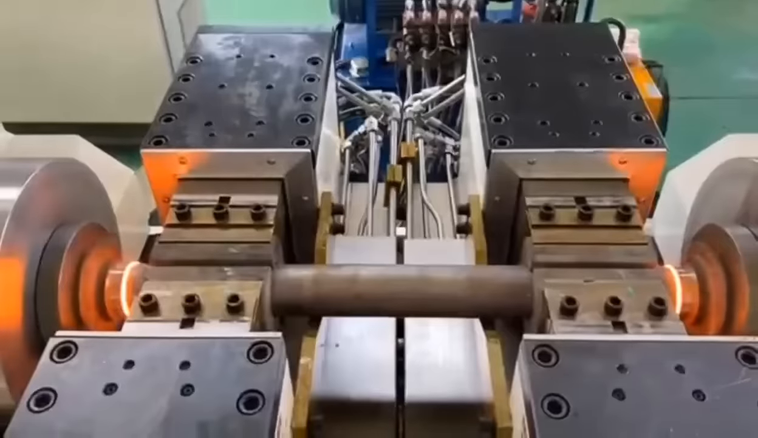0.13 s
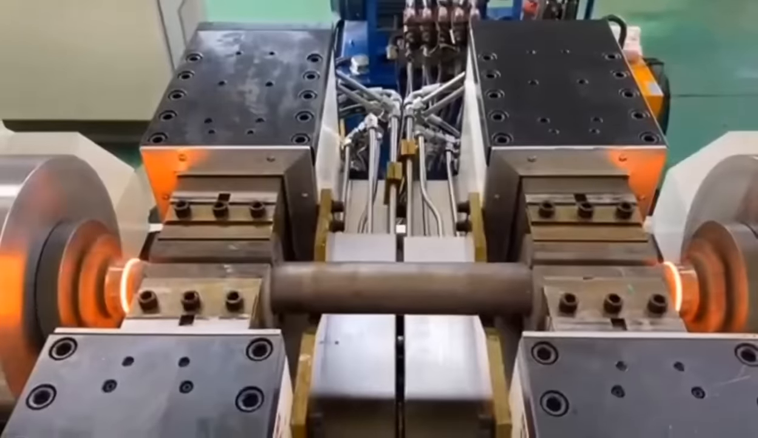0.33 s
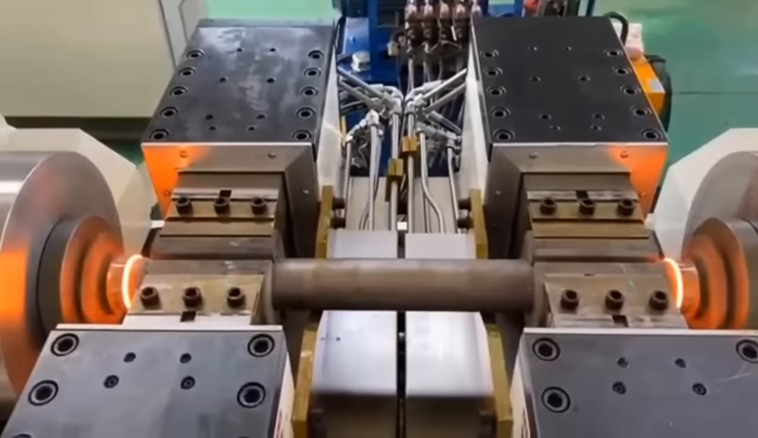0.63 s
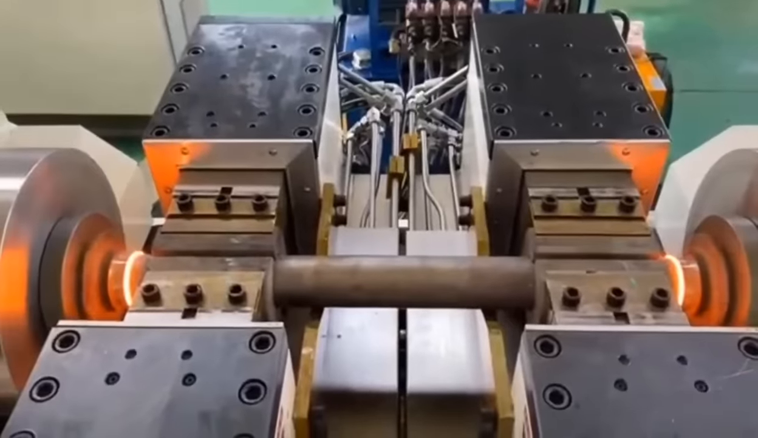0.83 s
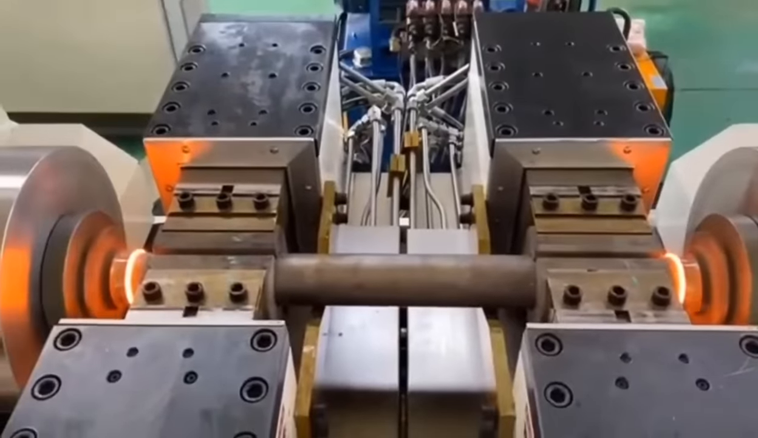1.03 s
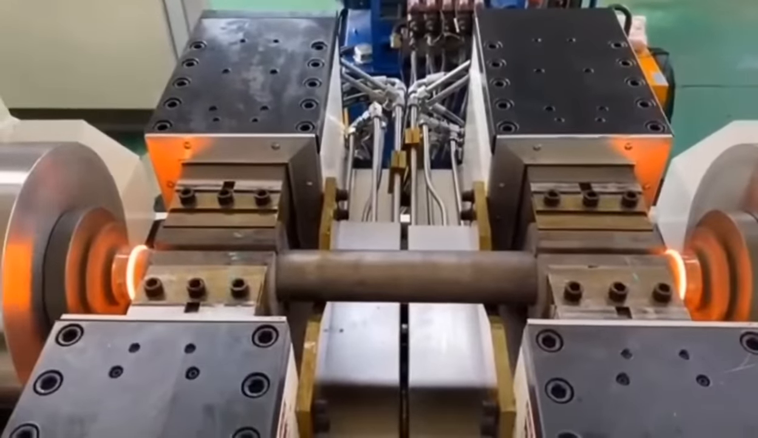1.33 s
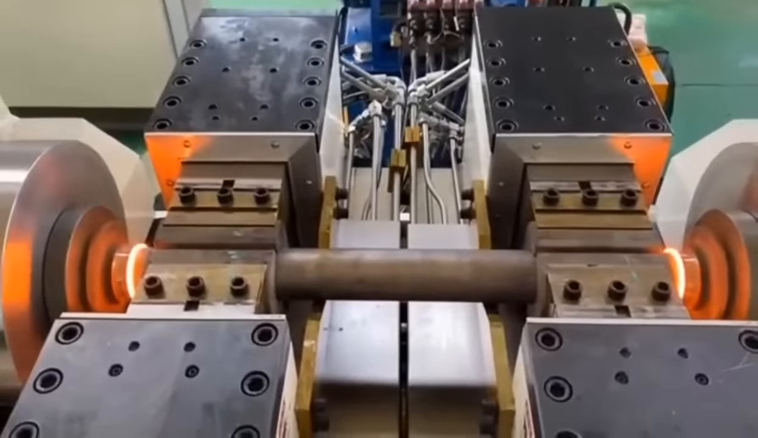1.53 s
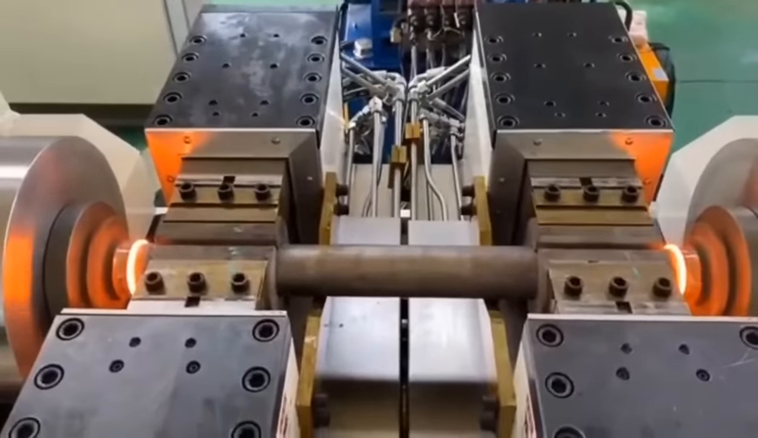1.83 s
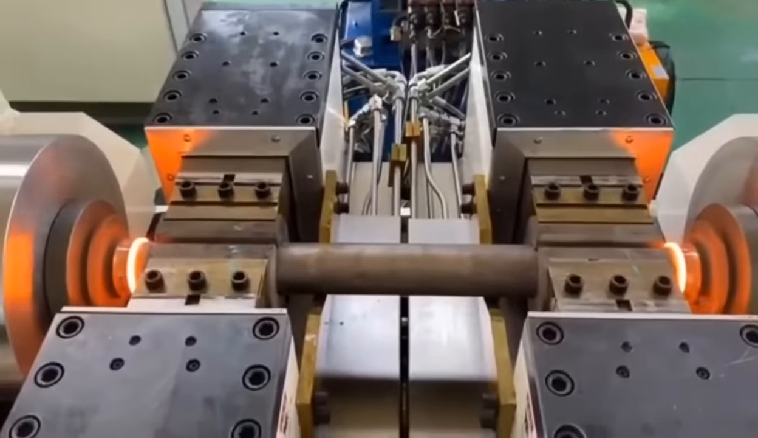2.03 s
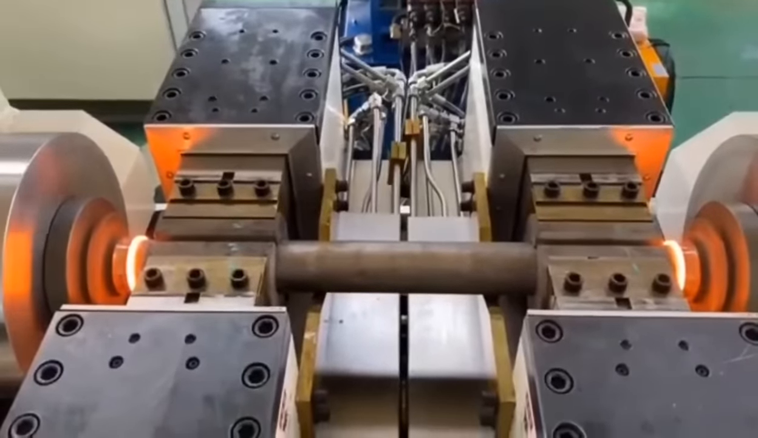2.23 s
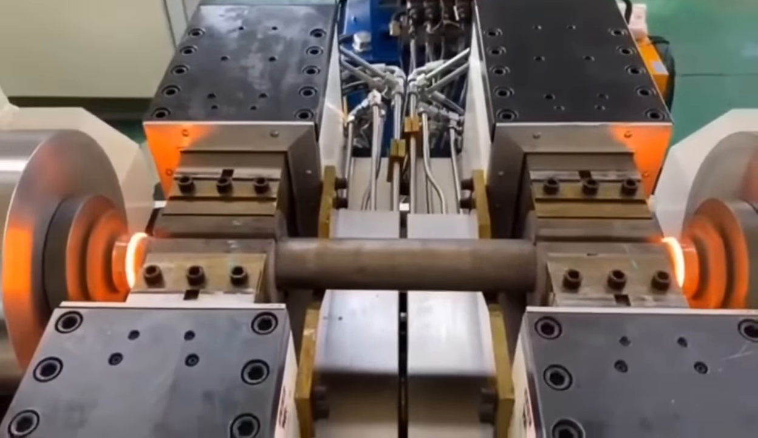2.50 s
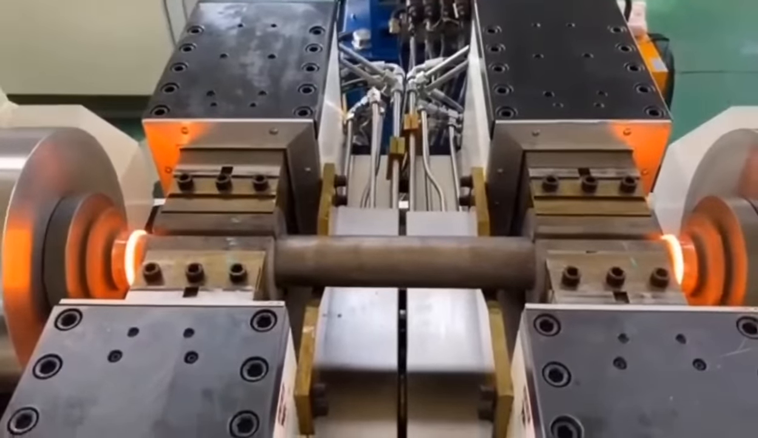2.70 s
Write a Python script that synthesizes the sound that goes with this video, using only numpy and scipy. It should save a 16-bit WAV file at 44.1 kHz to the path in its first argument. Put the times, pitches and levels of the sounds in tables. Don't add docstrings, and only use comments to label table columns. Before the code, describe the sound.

Steady high gear whine from a heavy spinning welder, swelling with low frame hum and rumble.

```python
import sys
import numpy as np
from scipy import signal
from scipy.fft import rfft, irfft
from scipy.io import wavfile
from scipy.ndimage import uniform_filter1d

SR = 44100
rng = np.random.default_rng(int(sys.argv[2]) if len(sys.argv) > 2 else 0)


def master_out(mix):
    frames = np.transpose(np.atleast_2d(mix))
    ceiling = np.clip(frames, -1, 1)
    pcm = np.round(ceiling * 32767).astype(np.int16)
    wavfile.write(sys.argv[1], SR, pcm)


def nominal_scale(level):
    x = np.asarray(level, float) / 20
    return 10 ** x


N = 126126
T = np.arange(N) / SR
MESH_HZ, WHEEL_TEETH, PINION_TEETH = 1083.38, 124, 50


def evened(x):
    return x / np.sqrt(np.mean(x ** 2) + 1e-20)


def hump(hz, centre_hz, width_hz):
    return 1 / (1 + (2 * (hz - centre_hz) / width_hz) ** 2)


def noise(gain):
    hz = np.fft.rfftfreq(N, 1 / SR)
    return irfft(rfft(rng.standard_normal(N)) * gain(hz), N) * np.sqrt(SR / 2)


def drift(rate_hz):
    return evened(noise(lambda hz: hump(hz, 0, rate_hz) * (hz > 0)))


def tones(pitches_hz, levels_db, waver_db):
    total = np.zeros(N)
    for hz, db in zip(pitches_hz, levels_db):
        level = np.sqrt(2) * nominal_scale(db + waver_db * drift(4.5))
        total += level * np.sin(2 * np.pi * (hz * T + rng.random()))
    return total


def rumble(resonances):
    def gain(hz):
        return np.sqrt(sum(nominal_scale(db) ** 2 / w * hump(hz, f, w) ** 2 for f, w, db in resonances))
    return noise(gain)


# pitch_hz [Hz], level_db [dB per Hz]
WASH_SPECTRUM = [(240, -67), (400, -30), (862, -22), (1080, -17.5), (1540, -34.5), (2140, -18.5),
                 (2770, -32), (3280, -34.5), (12000, -40), (15600, -106), (22000, -120)]


def wash():
    knots_hz, knots_db = np.transpose(WASH_SPECTRUM)

    def gain(hz):
        return nominal_scale(np.interp(np.log(hz + 1), np.log(knots_hz + 1), knots_db))
    return evened(noise(gain)) * nominal_scale(-13.5)


# pitch_hz [Hz], width_hz [Hz], level_db [dB], t60_s [s]
AIR_BANDS = [
    (7280, 1000, -60, .6),
    (7910, 560, -64.5, 1.2),
]


def air():
    total = np.zeros(N)
    for centre_hz, width_hz, db, t60_s in AIR_BANDS:
        hiss = evened(noise(lambda hz: 1 / (1 + (2 * (hz - centre_hz) / width_hz) ** 4)))
        total += hiss * nominal_scale(db - 60 * T / t60_s + drift(40))
    return total


# pitch_hz [Hz], width_hz [Hz], level_db [dB]
BED_RESONANCES = [(71.7, 18, -6.5), (109.6, 48, -5), (155, 80, 0.5), (461, 210, -4), (538, 120, -7.5),
                  (630.5, 55, -3.5)]


def bed():
    return rumble(BED_RESONANCES)


# pitch_hz [Hz], and level_db [dB] of each pitch
HUM_HZ = [148.5, 183.5, 192.15, 201.9, 209.7, 244.6, 279.5, 288.3, 297.1, 323.3, 332, 349.6, 360.6, 384.4,
          392, 463.1, 626.5]
HUM_DB = [-24.5, -16, -1, -8.5, -18, -20, -14.5, -14.5, -19, -18, -21, -10.5, -7, -16, -13, -21, -27.5]
# pitch_hz [Hz], width_hz [Hz], level_db [dB]
FRAME_RESONANCES = [(203, 78, -11.5), (212, 14, -16.5), (267.3, 28, -7), (314.6, 23, -7), (358.3, 59, -3)]


def frame(hum_db, rumble_db):
    hum = tones(HUM_HZ, HUM_DB, waver_db=1.2)
    return nominal_scale(hum_db) * hum + nominal_scale(rumble_db) * rumble(FRAME_RESONANCES)


# pitch_hz [Hz], and level_db [dB] of each pitch
BEARING_HZ = [1011.4, 2903.6, 3529.4, 3673.4, 3804, 3934.5, 4065.7, 4174.1, 4487, 4750.8, 4816, 5015.2,
              5191.5]
BEARING_DB = [-27, -39, -43, -43, -47, -45, -42, -45, -48, -49, -51, -48, -48]


def bearings():
    return tones(BEARING_HZ, BEARING_DB, waver_db=2.5)


# order [cycles per pinion turn], and level_db [dB] of each order
PINION_ORDERS = [47, 49, 51, 53, 59, 91, 93, 97, 99, 101, 103, 147, 149, 151]
PINION_DB = [-38, -29, -25, -39, -41, -42, -37, -31, -20, -30, -39, -42, -37, -38]


def pinion():
    return tones(np.array(PINION_ORDERS) * MESH_HZ / PINION_TEETH, PINION_DB, waver_db=1.5)


# [dB, rubbing noise]
CASE_RESONANCES = [(930, 32, -37, -71), (1175, 40, -46, -44), (1310, 320, -25.5, -34),
                   (1607, 72, -39, -39.5), (1720, 68, -51, -62), (1920, 110, -43, -33),
                   (2120, 140, -30, -31.5), (2420, 1350, -39, -53), (3254, 400, -48.5, -39),
                   (4302, 140, -45, -43.5), (5396, 140, -58.5, -50)]


def rubbing():
    def gain(hz):
        return np.sqrt(sum((nominal_scale(db - 11.5) * hump(hz, f, w)) ** 2 for f, w, _, db in CASE_RESONANCES))
    return noise(gain)


# order [cycles per wheel turn], level_db [dB]
WHEEL_LOW = [(103, -36), (104, -32), (106, -23), (107, -33), (108, -34), (109, -33), (111, -36), (113, -33),
             (114, -36), (115, -36), (117, -35), (118, -30), (119, -21), (120, -27), (121, -30), (122, -34),
             (123, -31), (125, -31), (126, -20), (127, -33), (128, -21), (129, -31), (130, -33), (131, -35),
             (132, -24), (134, -29), (135, -33), (138, -36), (145, -29), (146, -29), (151, -29), (153, -30),
             (154, -28), (157, -33), (159, -31), (160, -34)]
WHEEL_MID = [(207, -35), (208, -38), (209, -40), (210, -37), (211, -33), (212, -32), (214, -35), (215, -36),
             (216, -34), (220, -30), (221, -25), (222, -32), (223, -26), (224, -28), (225, -37), (226, -34),
             (228, -36), (231, -35), (232, -29), (233, -34), (234, -32), (235, -33), (236, -32), (237, -34),
             (238, -25), (239, -32), (240, -29), (242, -28), (243, -16), (244, -23), (246, -29), (247, -30),
             (249, -37), (250, -36), (251, -29), (252, -35), (253, -39), (255, -31), (256, -37), (257, -34),
             (258, -34), (259, -37), (260, -39), (266, -34), (270, -36), (276, -31), (277, -35), (280, -34),
             (284, -34), (285, -39)]
WHEEL_HIGH = [(300, -36), (301, -41), (302, -47), (303, -45), (305, -45), (318, -44), (331, -46),
              (332, -45), (338, -44), (349, -44), (350, -46), (352, -46), (356, -46), (358, -42),
              (360, -41), (361, -38), (362, -46), (364, -38), (365, -46), (367, -46), (368, -35),
              (369, -45), (370, -31), (374, -37), (376, -44), (378, -40), (379, -42), (380, -39),
              (381, -45), (382, -45), (383, -43), (387, -45), (389, -46), (394, -45), (404, -42),
              (492, -46)]


def wheel():
    size = 2 ** 15
    turn_hz = MESH_HZ / WHEEL_TEETH
    hz = np.arange(size // 2 + 1) * turn_hz
    level = np.sqrt(sum((nominal_scale(db) * hump(hz, f, w)) ** 2 for f, w, db, _ in CASE_RESONANCES))
    spread_db = 6 * np.clip(rng.standard_normal(len(hz)), -2, 1) - 5
    level = np.minimum(level * nominal_scale(spread_db), nominal_scale(-44))
    orders, db = np.transpose(WHEEL_LOW + WHEEL_MID + WHEEL_HIGH)
    level[orders.astype(int)] = nominal_scale(db - 0.9)
    level[WHEEL_TEETH::WHEEL_TEETH] = 0
    wheels = level * np.exp(2j * np.pi * rng.random((16, len(hz))))
    throb = abs(np.fft.ifft(wheels[:, 215:265], n=512)).std(axis=1)
    turn = irfft(wheels[throb.argmin()], size) * size / np.sqrt(2)
    return np.interp(T * turn_hz % 1 * size, np.arange(size), turn, period=size)


MESH_DB = [-2, -13, -16.5, -36, -46]
MESH_FOLLOW = [0, .3, -.3, .5, 0]


def mesh(load_db):
    pitches_hz = MESH_HZ * np.arange(1, len(MESH_DB) + 1)
    levels_db = [db + follow * load_db for db, follow in zip(MESH_DB, MESH_FOLLOW)]
    return tones(pitches_hz, levels_db, waver_db=0.58)


def gears(load_db):
    return mesh(load_db) + pinion() + wheel() + bearings() + rubbing()


# [dB,
# forging force]
LOAD = [
    (0.0, -50, -64.5, -78, -84),
    (0.04, -49.5, -68, -65.5, -78),
    (0.71, -48.5, -67.5, -62, -76),
    (0.88, -48, -64.5, -67, -76),
    (0.95, -47, -65.5, -56.5, -76),
    (1.07, -47, -56, -61, -72.5),
    (1.52, -45.5, -55.5, -55.5, -62.5),
    (2.31, -44, -55.5, -56, -63),
    (2.8, -43.5, -53.5, -56.5, -62),
    (2.86, -44, -63, -53, -60),
]


def scene():
    start_s, *levels_db = np.transpose(LOAD)
    gear_db, hum_db, rumble_db, bed_db = (np.interp(T, start_s, db) for db in levels_db)
    load_db = gear_db - gear_db.mean()
    hall_db = gear_db.mean() + 0.65 * load_db
    background = nominal_scale(hall_db) * wash() + air()
    machine = nominal_scale(bed_db) * bed() + frame(hum_db, rumble_db) + nominal_scale(gear_db) * gears(load_db)
    return (background + machine)[None]


# low_hz [Hz], high_hz [Hz], share [of time silent]
DROPOUT_BANDS = [(1480, 1580, .27), (1580, 1670, .33), (1670, 1750, .28), (2680, 2820, .12),
                 (3500, 3650, .14), (3650, 3800, .17), (3800, 3920, .12), (3920, 4030, .1), (4500, 4680, .2),
                 (5540, 5680, .18), (5800, 6000, .06), (6300, 6900, .25), (6900, 7450, .5), (7450, 7850, .05),
                 (7850, 8250, .25), (8250, 8450, .2), (8450, 8900, .62), (8900, 9450, .58), (9450, 9680, .2),
                 (9680, 9850, .45), (9850, 10050, .42), (10050, 10250, .55), (10250, 10550, .3),
                 (10550, 11050, .2), (11050, 11550, .3), (11550, 11850, .15), (11850, 12030, .3),
                 (12030, 13000, 1)]
# start_s [s], end_s [s]
VALLEY_SHUT = [(.02, .05), (.09, .13), (.17, .24), (.28, .35), (.69, .81), (.84, .87), (.9, .96),
               (1.08, 1.18), (1.22, 1.29), (1.45, 1.51), (1.63, 1.66), (1.92, 1.96), (2.02, 2.11),
               (2.29, 2.32)]
# pitch_hz [Hz], share [of bins]
SPARSE = [(3400, .25), (6000, .55), (8400, .75), (12000, .7)]


def dropouts(x):
    size, hop = 1152, 576
    shut, open_db = nominal_scale(-45), 5
    window = np.sin(np.pi * (np.arange(size) + .5) / size)
    hz, t, z = signal.stft(x, SR, window, nperseg=size, noverlap=hop)
    slow, quick = rng.standard_normal((len(t), len(DROPOUT_BANDS), 2)).T
    chance = uniform_filter1d(slow, 7, axis=1) + .2 * quick
    smooth = uniform_filter1d(uniform_filter1d(abs(z), size=9, axis=0), size=9, axis=1)
    lift_db = 20 * np.log10(smooth / np.median(smooth, axis=1, keepdims=True))

    patches = uniform_filter1d(rng.standard_normal(z.shape), size=10, axis=0)
    patches = evened(uniform_filter1d(patches, size=4, axis=1))
    gain = nominal_scale(2.5 * patches * (hz > 3330)[:, None] * (lift_db < open_db))

    valley = sum((t >= start_s) & (t <= end_s) for start_s, end_s in VALLEY_SHUT)
    for (low_hz, high_hz, share), c in zip(DROPOUT_BANDS, chance):
        band = (hz >= low_hz) & (hz < high_hz)
        lift = lift_db[band].mean(0)
        c = c + (low_hz < 4700) * .05 * lift + (lift > open_db)
        c = c - (high_hz <= 1750) * 1.6 * valley
        gain[np.ix_(band, c <= np.quantile(c, min(share * 1.3, 1)))] = shut

    masked_s = .235
    masked = (t < masked_s) & ((quick[0] < .8) | (t < masked_s / 2))
    gain[np.ix_((hz > 8450) & (hz < 10300), masked)] = shut

    rank = (abs(z) / smooth).argsort(axis=1).argsort(axis=1) / len(t)
    share = np.interp(hz, *np.transpose(SPARSE), left=0)[:, None]
    gain[(rank < share) & (lift_db < open_db)] = shut
    return signal.istft(z * gain, SR, window, nperseg=size, noverlap=hop)[1][:N]


# [dB, peak]
TICKS_UP = [(0.1321, -75), (0.1551, -73), (0.2479, -75), (0.2948, -75), (0.3407, -78), (0.4804, -75),
            (0.5033, -72), (0.5951, -75), (0.7123, -68), (0.7582, -76), (0.9443, -70), (1.0371, -71),
            (1.085, -78), (1.1538, -66.5), (1.316, -70), (1.4087, -80), (1.4322, -76), (1.5928, -76),
            (1.6183, -69), (1.8014, -79), (1.9196, -71), (2.1979, -78), (2.3371, -77), (2.383, -72),
            (2.5232, -79), (2.5696, -76), (2.5931, -67), (2.6624, -76), (2.7093, -75), (2.7791, -73)]
TICKS_DOWN = [(0.2467, -77.5), (0.2707, -97), (0.4099, -80), (0.5031, -90), (0.7586, -71), (0.8269, -74),
              (0.8982, -73), (0.9441, -72), (1.223, -71), (1.247, -70), (1.3382, -73), (1.3851, -70),
              (1.4086, -74), (1.5253, -71), (1.6874, -66), (1.8261, -69), (1.8965, -68), (2.2182, -69.5),
              (2.2676, -77), (2.337, -77), (2.3844, -69), (2.4063, -66), (2.5235, -72), (2.6385, -65.5)]


def ticks():
    length_s = .006
    out, t = np.zeros(N), np.arange(-length_s / 2, length_s / 2, 1 / SR)
    for table, low_hz, high_hz in ((TICKS_UP, 8950, 9650), (TICKS_DOWN, 8200, 8800)):
        start_s, db = np.transpose(table)
        train = np.zeros(N)
        train[(start_s * SR).astype(int)] = nominal_scale(db + 3)
        blip = np.hanning(len(t)) * np.sinc((high_hz - low_hz) * t) * np.sin(np.pi * (low_hz + high_hz) * t)
        out += signal.oaconvolve(train, blip)[len(t) // 3:][:N]
    return out


def band_limit(x):
    return signal.sosfilt(signal.butter(12, 12130, fs=SR, output="sos"), x)


def record(dry):
    mix = (dropouts(dry[0]) + ticks())[None]
    return band_limit(mix)


dry = scene()
out = record(dry)
master_out(out)
```